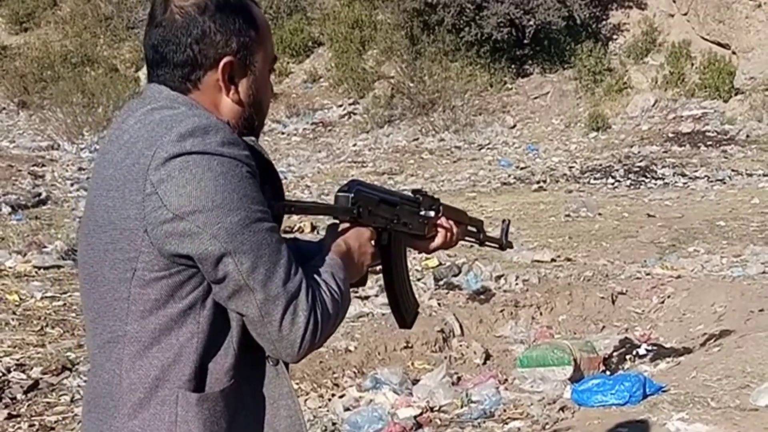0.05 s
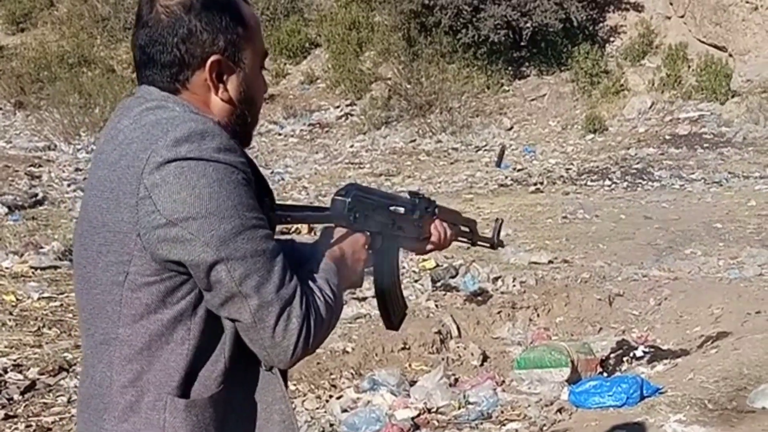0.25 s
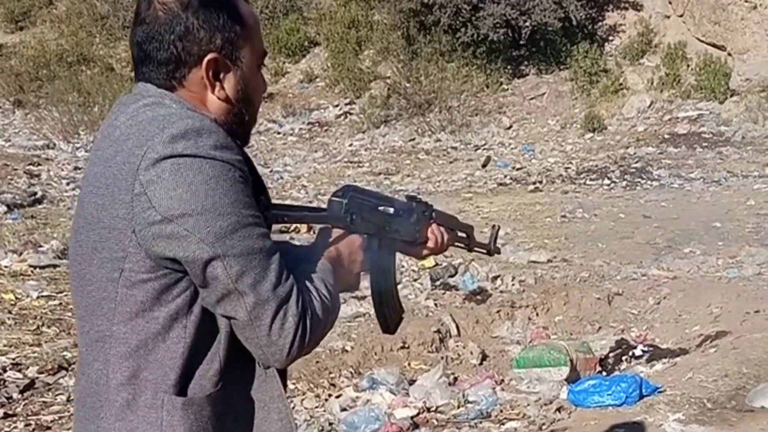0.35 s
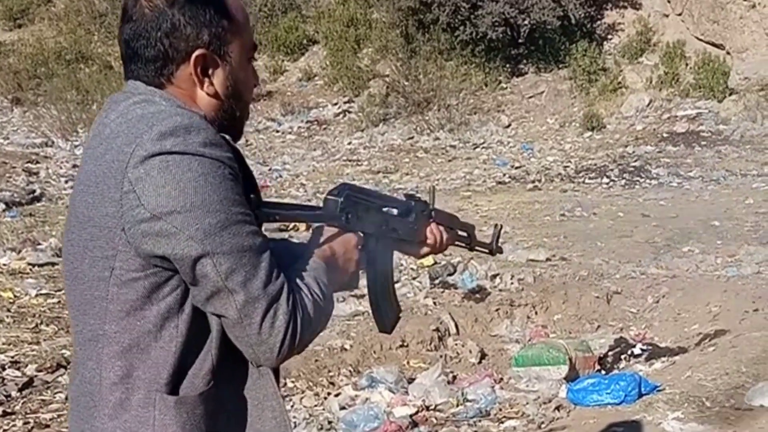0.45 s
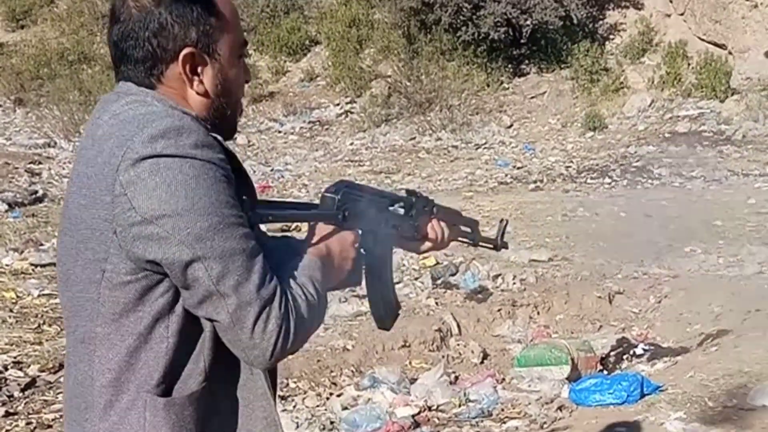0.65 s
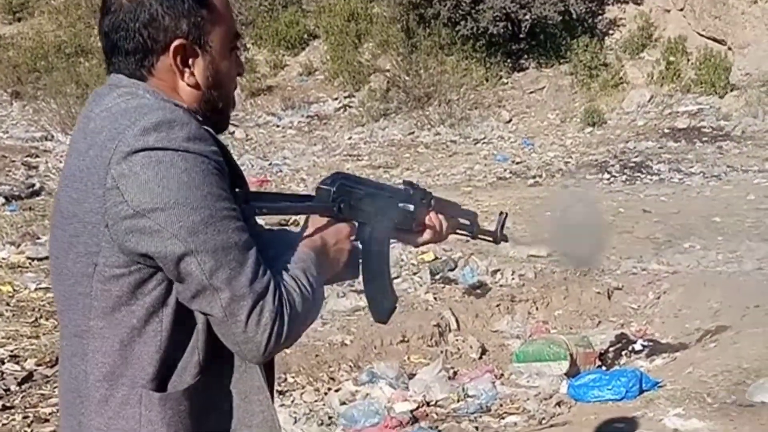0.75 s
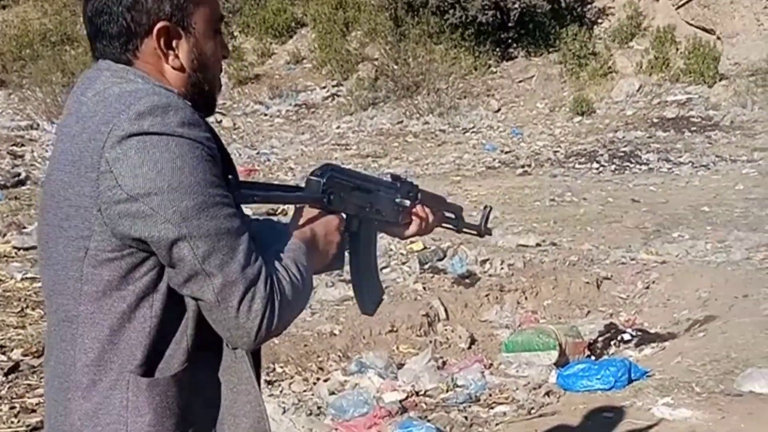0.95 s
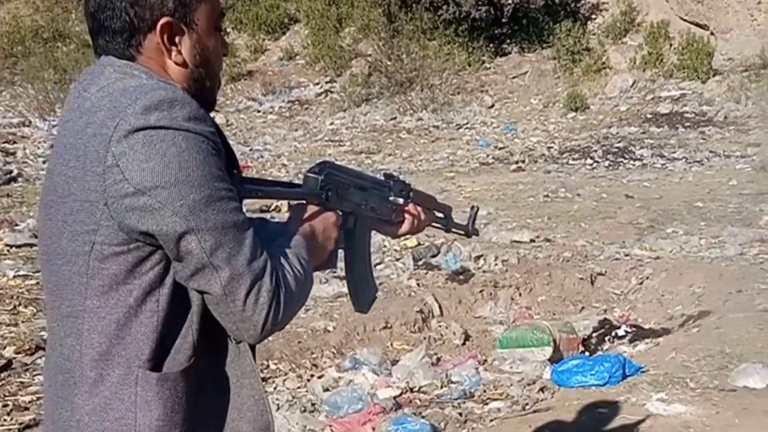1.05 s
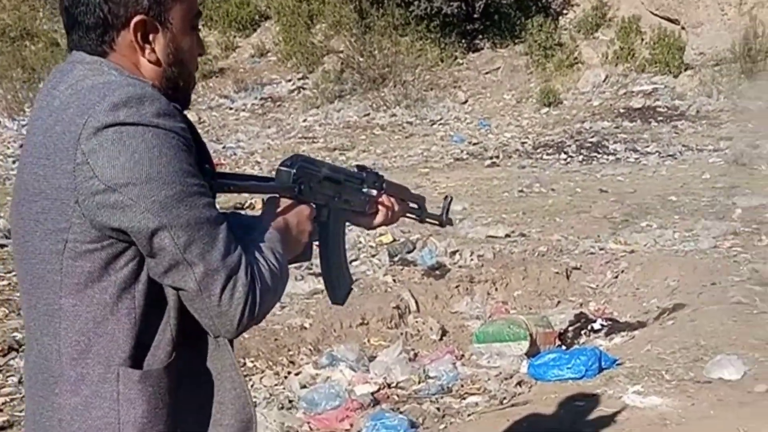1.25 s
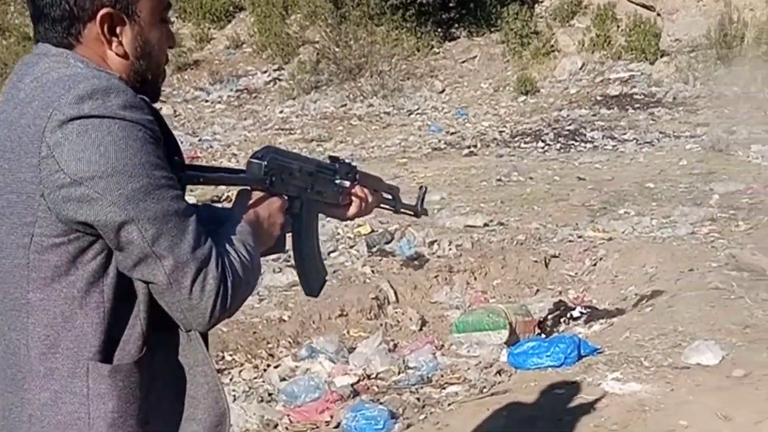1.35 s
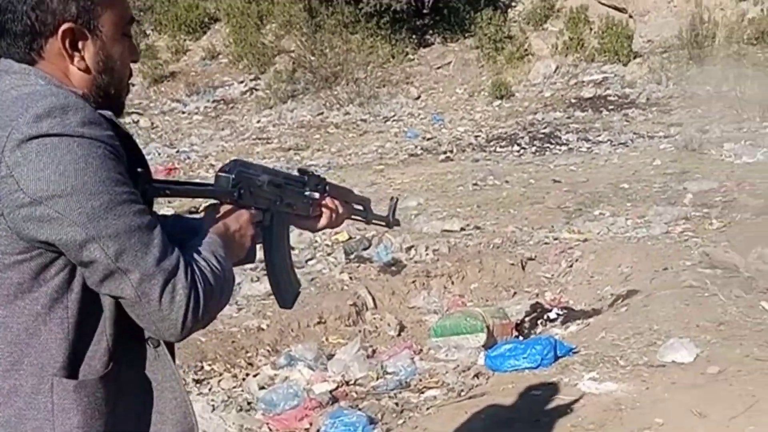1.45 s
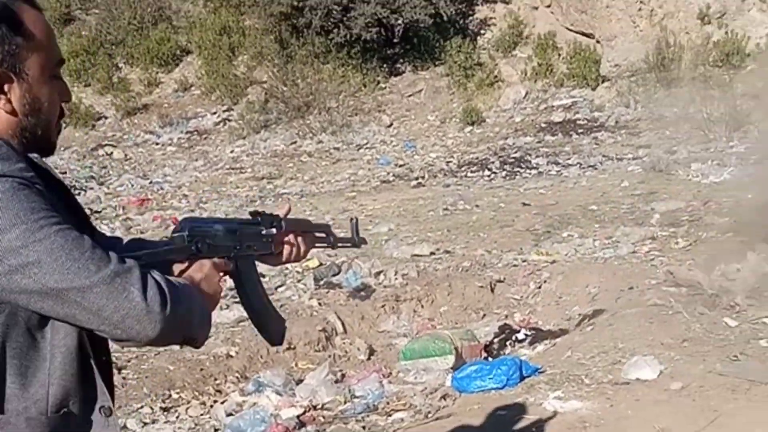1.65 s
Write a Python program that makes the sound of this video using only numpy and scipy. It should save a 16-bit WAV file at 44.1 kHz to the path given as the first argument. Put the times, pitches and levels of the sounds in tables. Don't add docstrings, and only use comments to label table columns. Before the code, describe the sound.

Automatic rifle fires a rapid seven-round burst outdoors, bolt clacking, with echoes rumbling away

```python
import sys
import numpy as np
from scipy import signal
from scipy.fft import rfft, irfft
from scipy.io import wavfile
from scipy.ndimage import uniform_filter1d

SR = 44100
rng = np.random.default_rng(int(sys.argv[2]) if len(sys.argv) > 2 else 0)


def magnitude_from_level(level_db):
    exponent = np.asarray(level_db, float) / 20
    return 10 ** exponent


def waveform_to_disk(signal):
    frames = np.transpose(np.atleast_2d(signal))
    scaled = np.clip(frames, -1, 1) * 32767
    samples = np.round(scaled).astype(np.int16)
    wavfile.write(sys.argv[1], SR, samples)


N = 74970

# [f/Hz, level/dB]
AIR_COLOUR = [(15, -59.5), (25, -6.5), (145, 5), (185, -22.5), (285, -6.5), (463, -20), (1790, -24.5),
              (3720, -48), (16000, -40.5)]
AIR_DB = -64
# [t/s, length/s, level/dB, f/Hz]
CHIRPS = [
    (.02, 0.034, -74, 875),
    (.063, .01, -76, 570),
]
# [t/s, length/s, level/dB, f/Hz]
THUDS = [
    (1.224, .05, -33.5, 130),
    (1.35, .04, -46, 150),
    (1.46, .05, -50, 150),
    (.02, .03, -66, 140),
]
# [t/s, peak level/dB]
TAPS = [
    (1.2182, -22),
    (1.291, -31.5),
    (1.566, -44),
]
TAP_DB, TAP_HZ, TAP_WIDTH_HZ = -11.5, 1400, 1300
# [t/s, length/s, level/dB, f/Hz]
HOLLOW = [
    (1.046, 0.032, -22.5, 194.6),
    (1.066, 0.029, -23, 687),
    (1.09, 0.04, -26, 581.4),
    (1.124, 0.034, -26, 620),
    (1.155, 0.071, -36, 599.5),
    (1.19, 0.025, -41, 1176),
    (1.03, 0.052, -31.5, 90.2),
    (1.1, .08, -38, 111),
]

# [f/Hz, level/dB]
GROUND_COLOUR = [(35, -19.5), (60, -33), (224, -13), (648, 2.5), (1080, -17.5), (1830, -1), (4210, -25),
                 (7000, -25), (15000, -52)]
GROUND_DB, GROUND_T60_S, GROUND_ENDS_S = -12.5, 0.14, 0.035
# [delay t/s, length/s, level/dB, centre f/Hz, width/Hz]
ECHOES = [(.004, .025, -27.5, 290, 114.4), (.006, 0.033, -30.5, 1300, 77.4), (.022, .016, -23, 520, 416),
          (0.065, 0.03, -37.5, 509.3, 400), (0.057, 0.012, -30.5, 188, 97.2), (.06, 0.021, -43, 1960, 900),
          (0.096, .025, -49, 443, 500), (0.134, 0.092, -40, 95, 62), (.15, 0.046, -27.5, 2150, 400),
          (0.12, 0.076, -29.5, 207, 44), (0.163, .05, -27, 612, 280), (0.165, 0.05, -33, 1240, 500),
          (.17, .06, -43.5, 2500, 900), (.2, 0.08, -29, 584, 90), (0.114, .09, -63, 6300, 2500),
          (0.124, .06, -33.5, 1565, 1176)]
ECHO_RISE_S, ECHO_HOLD, ECHO_FADE = .004, .7, 1.3
# [f/Hz, level/dB]
SLOPE_COLOUR = [(24, -59.5), (40, -39.5), (185, -1.5), (401, -5), (698, -15), (996, -17.5), (1160, -12),
                (2160, -9.5), (8000, -76), (10400, -99.5), (17600, -120)]
SLOPE_DB, SLOPE_FROM_S, SLOPE_TO_S, SLOPE_T60_S = -29, 0.034, 0.2, .15
# [f/Hz, level/dB]
VALLEY_COLOUR = [(24, -58), (40, -13.5), (150, -2.5), (347, -10), (410, -17), (538, -6.5), (948, -13.5),
                 (2150, -15.5), (6000, -53.5), (7800, -100.5), (13200, -120)]
VALLEY_DB, VALLEY_FROM_S, VALLEY_T60_S = -46, 0.13, 2.78

# [t/s, peak level/dB]
CLACKS = [(0.312, -32), (0.3207, -6.5), (0.3317, -7), (0.4294, -6), (0.542, -1), (0.6644, -3.5),
          (0.769, -6.5), (0.7834, -7.5), (0.8824, -20), (0.9907, 2), (0.999, -13), (1.0264, -23)]
TRIGGER_S, TRIGGER_DB = .229, -40
# [f/Hz, level/dB, t60/s]
CLACK_MODES = [(1890, -15.5, 0.016), (2149, 1, 0.012), (2500, -9.5, 0.0033), (3500, -25.5, 0.0053)]
BOLT_DB, RATTLE_T60_S, RATTLE_DB = -13, .045, -27
# [f/Hz, level/dB]
SCRAPE_COLOUR = [(1470, -13.5), (2500, -1), (3920, -20.5), (5660, -29.5), (7110, -18), (8040, -21),
                 (14100, -43), (15500, -39.5)]
TRAVEL_DB, TRAVEL_FROM_S, TRAVEL_RISE_S, TRAVEL_T60_S, GRAINS_PER_S = -37, 0.023, 0.073, 0.15, 1100

# [t/s, peak level/dB]
SHOTS = [
    (.2382, -.6),
    (.3409, 0),
    (.4517, .3),
    (.5629, -.2),
    (.6728, .4),
    (.7899, .3),
    (.9004, 0),
]
SAME_SHARE = .55
MUZZLE_LAG_S = .001
SNAP_DB, SNAP_HZ, SNAP_T60_S = 9, 2200, .006
PUSH_DB, PUSH_S, PUSH_LAG_S = 11, .0010, .0012
BOUNCE_S, BOUNCE_DB, BOUNCE_SWAY_S = .0075, -10, .0006
# [f/Hz, level/dB]
GAS_COLOUR = [(35, -45), (60, 1), (590, -1), (1060, 1.5), (1360, 5), (1910, 7), (2160, 10), (6440, -21.5),
              (9000, -42), (11700, -75.5), (19800, -120)]
GAS_DB, GAS_FROM_S, GAS_HOLD_S, GAS_T60_S = 1.5, .002, .004, .025

# [offset t/s, length/s, level/dB]
DUCKS = [
    (-.008, .008, -6),
    (.036, .012, -4),
]
CEILING, HARDNESS, LIMIT, LOW_CUT_HZ = .57, 4.0, .61, 60
DULL_HZ, BRIGHT_DB, AIRY_HZ, AIRY_DB = 7500, -15, 13500, 3
CUTOFF_HZ, LEAK_DB, HISS_DB = 15300, -20, -88


def unit(x):
    return x / np.sqrt(np.mean(x ** 2) + 1e-20)


def coloured(spectrum):
    hz, db = np.transpose(spectrum)
    f = np.arange(N // 2 + 1) * SR / N + 1
    gain = magnitude_from_level(np.interp(np.log(f), np.log(hz), db))
    return unit(irfft(rfft(rng.standard_normal(N)) * gain, N))


def resonant(hz, width_hz):
    r = np.exp(-np.pi * width_hz / SR)
    a = [1, -2 * r * np.cos(2 * np.pi * hz / SR), r * r]
    once = signal.lfilter([1, 0, -1], a, rng.standard_normal(N))
    x = signal.lfilter([1, 0, -1], a, once)
    local_power = uniform_filter1d(x ** 2, size=700)
    return unit(x / np.sqrt(local_power + 0.12 * np.mean(x ** 2)))


def envelope(start, rise, hold, t60):
    t = np.arange(N) / SR - start
    onset = np.sin(np.pi / 2 * np.clip(t / rise, 0, 1)) ** 2
    return onset * magnitude_from_level(-60 * np.clip(t - rise - hold, 0, None) / t60)


def ring(x, hz, t60):
    r, w = magnitude_from_level(-60 / (t60 * SR)), 2 * np.pi * hz / SR
    return signal.lfilter([0, np.sin(w)], [1, -2 * r * np.cos(w), r * r], x + 1e-18)


def puffs(rows, width_share):
    t = np.arange(N) / SR
    out = np.zeros(N)
    for s, length, db, hz in rows:
        tone = np.sqrt(2) * np.sin(2 * np.pi * hz * t)
        rough = .6 * resonant(hz, width_share * hz)
        out += magnitude_from_level(db) * (tone + rough) * envelope(s, .25 * length, .65 * length, .9 * length)
    return out


def each_round(response):
    out, common = np.zeros(2 * N), response()
    mean_db = np.mean(SHOTS, axis=0)[1]
    for s, db in SHOTS:
        i = int(s * SR)
        mixed = np.sqrt(SAME_SHARE) * common + np.sqrt(1 - SAME_SHARE) * response()
        out[i:i + N] += magnitude_from_level(db - mean_db) * mixed
    return out[:N]


def air():
    return magnitude_from_level(AIR_DB) * coloured(AIR_COLOUR)


def taps():
    knocks = np.zeros(N)
    for s, db in TAPS:
        knocks += magnitude_from_level(TAP_DB + db) * resonant(TAP_HZ, TAP_WIDTH_HZ) * envelope(s, .0015, .001, .02)
    return signal.sosfilt(signal.butter(3, 2500, fs=SR, output="sos"), knocks)


def terrain():
    ground = magnitude_from_level(GROUND_DB) * coloured(GROUND_COLOUR) * envelope(0.001, 0.001, 0, GROUND_T60_S)
    out = ground * envelope(0, 0.00061, GROUND_ENDS_S, 0.09)
    slope_hold = SLOPE_TO_S - SLOPE_FROM_S
    out += magnitude_from_level(SLOPE_DB) * coloured(SLOPE_COLOUR) * envelope(SLOPE_FROM_S, 0.027, slope_hold, SLOPE_T60_S)
    out += magnitude_from_level(VALLEY_DB) * coloured(VALLEY_COLOUR) * envelope(VALLEY_FROM_S, 0.26, 0, VALLEY_T60_S)
    for lag, length, db, hz, width_hz in ECHOES:
        swell = envelope(lag, ECHO_RISE_S, ECHO_HOLD * length, ECHO_FADE * length)
        out += magnitude_from_level(db) * resonant(hz, width_hz) * swell
    return out


def ducking():
    dip_db = np.zeros(N)
    for s, _ in SHOTS:
        for lag, length, db in DUCKS:
            dip_db += db * envelope(s + lag, 0.71 * length, .5 * length, .5 * length)
    return magnitude_from_level(dip_db)


def bolt_travel():
    grains = (rng.random(N) < GRAINS_PER_S / SR) * rng.exponential(1, N)
    bumps = .5 + unit(signal.lfilter([1], [1, -.97], grains))
    run = envelope(TRAVEL_FROM_S, TRAVEL_RISE_S, 0, TRAVEL_T60_S)
    return magnitude_from_level(TRAVEL_DB) * coloured(SCRAPE_COLOUR) * bumps * run


def clacks():
    out = np.zeros(N)
    rows = list(CLACKS) + [(TRIGGER_S, TRIGGER_DB - BOLT_DB)]
    sways_db = rng.normal(0, 2, (len(rows), len(CLACK_MODES) + 1))
    for (s, db), sway_db in zip(rows, sways_db):
        hit = 0.16 * rng.standard_normal(N) * envelope(s, 0.00046, 0.00049, 0.015)
        for (hz, level, t60), sway in zip(CLACK_MODES, sway_db):
            out += magnitude_from_level(BOLT_DB + db + level + sway) * ring(hit, hz, t60)
        rattle = coloured(SCRAPE_COLOUR) * envelope(s, 0.0035, 0.012, RATTLE_T60_S)
        out += magnitude_from_level(RATTLE_DB + db + sway_db[-1]) * rattle
    return out


def blast():
    t = np.arange(N) / SR - MUZZLE_LAG_S
    impulse = 1.0 * (np.arange(N) == int(MUZZLE_LAG_S * SR))
    out = -magnitude_from_level(SNAP_DB) * ring(impulse, SNAP_HZ, SNAP_T60_S)
    bounce_lag = BOUNCE_S + BOUNCE_SWAY_S * rng.standard_normal()
    for lag, db in (PUSH_LAG_S, 0), (bounce_lag, BOUNCE_DB):
        u = np.clip(t - lag, 0, None) / PUSH_S
        out += magnitude_from_level(PUSH_DB + db) * np.clip(u / .25, 0, 1) * (1 - .7 * u) * np.exp(-u)
    return out + magnitude_from_level(GAS_DB) * coloured(GAS_COLOUR) * envelope(GAS_FROM_S, 0.00094, GAS_HOLD_S, GAS_T60_S)


def scene():
    background = air() + puffs(CHIRPS, 0.077) + puffs(THUDS, 0.33) + taps() + puffs(HOLLOW, 0.45)
    returns = each_round(terrain) * ducking()
    mechanism = each_round(bolt_travel) + clacks()
    return (background + returns + mechanism + each_round(blast))[None]


def low_pass(x):
    return signal.sosfilt(signal.butter(12, 16610, fs=SR, output="sos"), x)


def record(dry):
    def cut(x, hz, kind, order):
        return signal.sosfilt(signal.butter(order, hz, kind, fs=SR, output="sos"), x)

    def clip(x, top, hardness):
        return x / (1 + np.abs(x / top) ** hardness) ** (1 / hardness)

    overloaded = clip(cut(dry, 65, "high", order=2), CEILING, HARDNESS)
    x = cut(overloaded, LOW_CUT_HZ, "high", order=1)
    dulled = cut(x, DULL_HZ, "low", order=4) + magnitude_from_level(BRIGHT_DB) * x
    x = clip(dulled, LIMIT, 2 * HARDNESS)
    airy = magnitude_from_level(AIRY_DB) * cut(x, AIRY_HZ, "high", order=2)
    x = x + airy + magnitude_from_level(HISS_DB) * rng.standard_normal(x.shape)
    leak = magnitude_from_level(LEAK_DB) * cut(x, CUTOFF_HZ + 1000, "low", order=16)
    band_limit = signal.cheby1(12, .5, CUTOFF_HZ, fs=SR, output="sos")
    mix = leak + signal.sosfilt(band_limit, x)
    return low_pass(mix)


dry = scene()
out = record(dry)
waveform_to_disk(out)
```